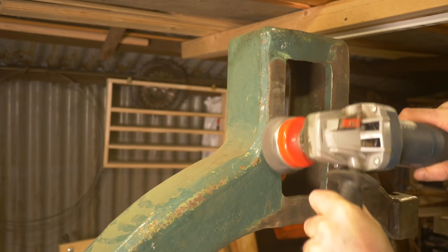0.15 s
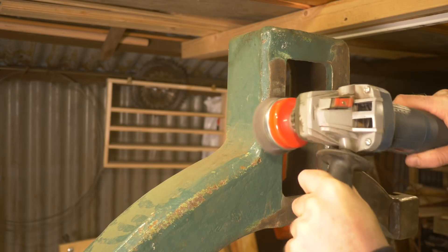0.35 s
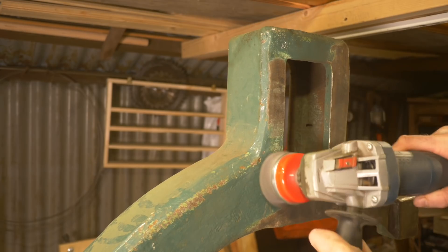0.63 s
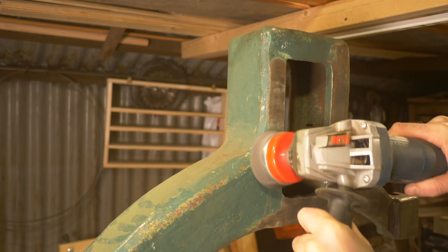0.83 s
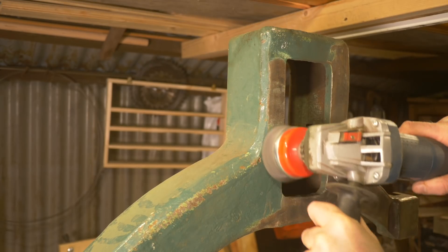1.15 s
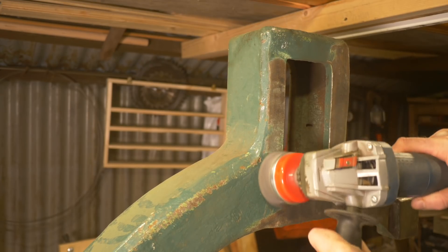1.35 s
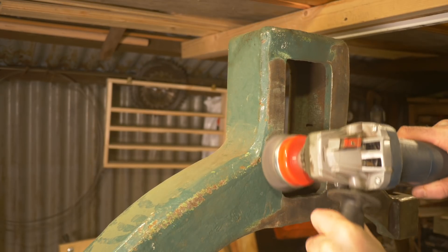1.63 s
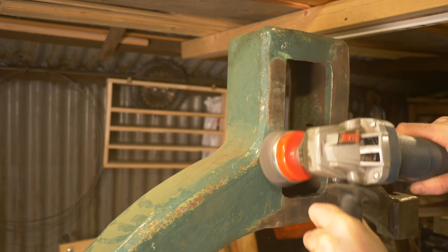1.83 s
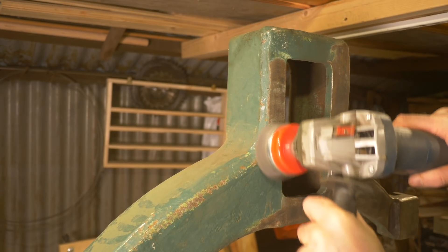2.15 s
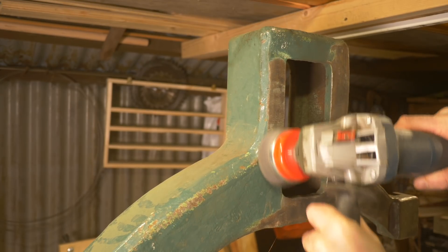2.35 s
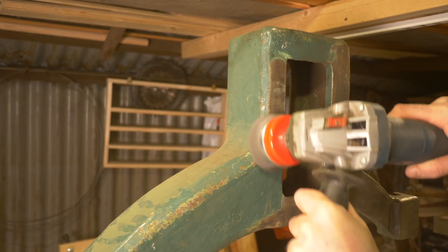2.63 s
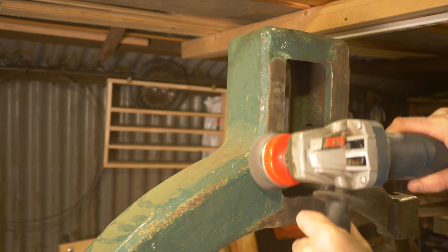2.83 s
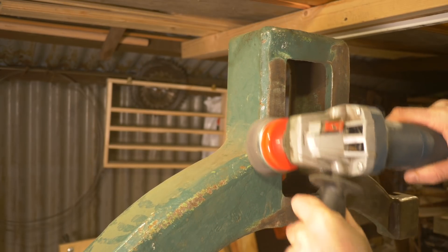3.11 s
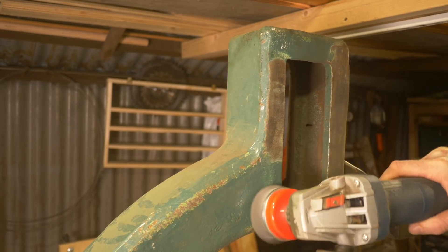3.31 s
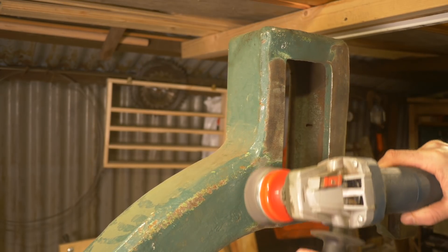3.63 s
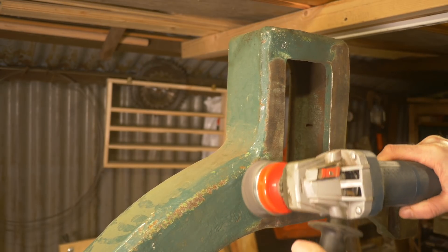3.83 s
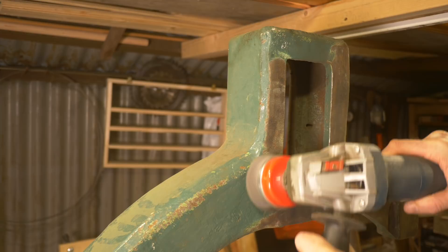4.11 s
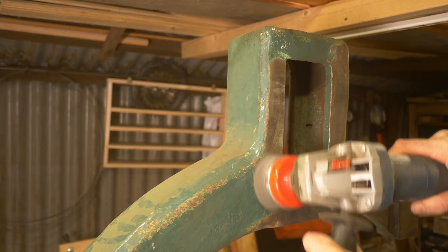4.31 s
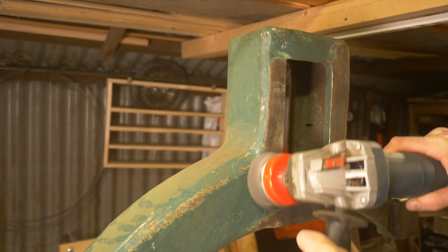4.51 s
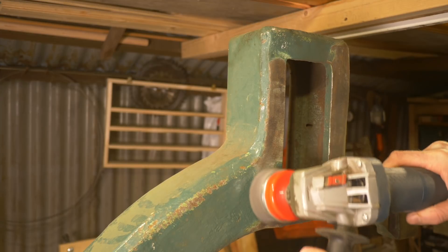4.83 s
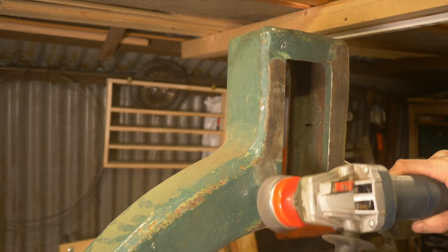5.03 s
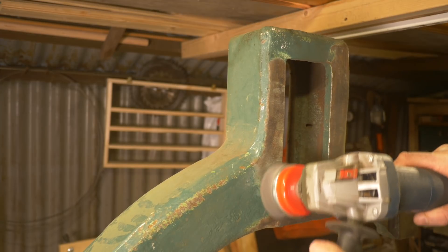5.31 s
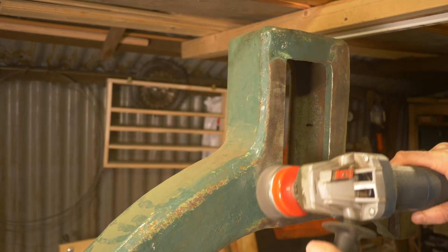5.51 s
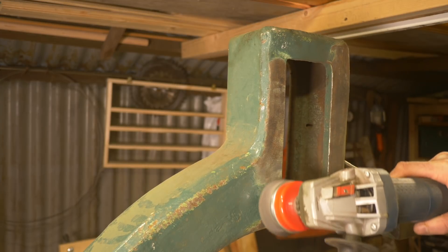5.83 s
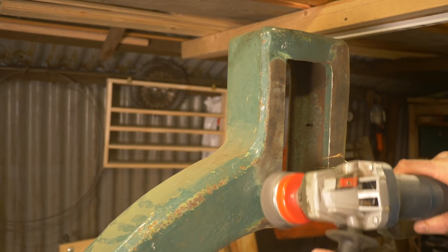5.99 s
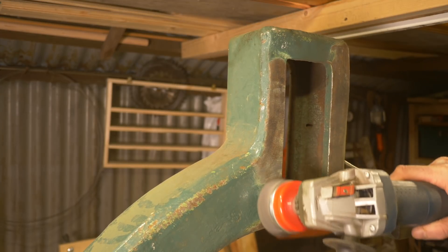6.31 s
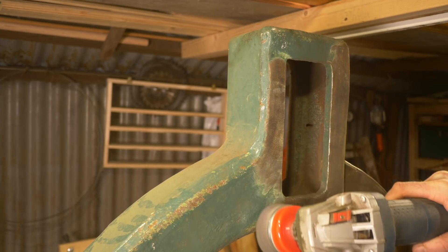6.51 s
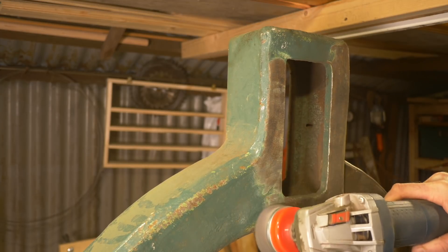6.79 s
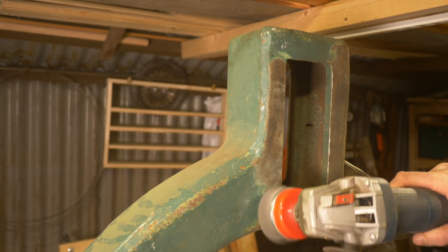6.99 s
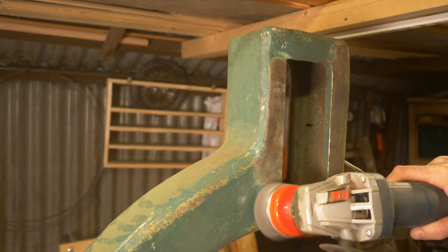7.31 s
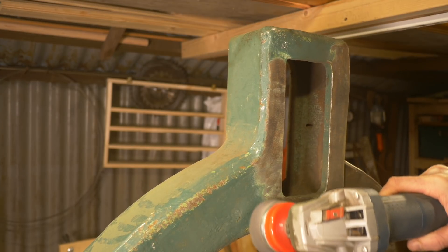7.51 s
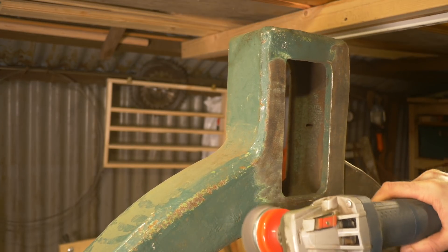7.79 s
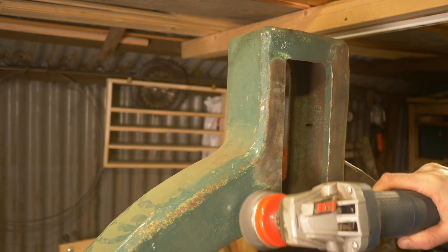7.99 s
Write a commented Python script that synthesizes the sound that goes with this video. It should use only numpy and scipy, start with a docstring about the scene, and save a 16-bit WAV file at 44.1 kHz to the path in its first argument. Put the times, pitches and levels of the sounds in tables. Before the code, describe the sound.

Close in a small workshop, an angle grinder's wire cup wheel scrubs a heavy metal frame without pause. It begins turned far down, then snaps to full level before one second. A dense, bright, rasping scrape dominates, with a very high thin motor whine that wavers and sags with each stroke. Brief low air buffets touch the microphone around three to four seconds. Short room reflections, centred sound.

```python
"""In a workshop, close by, an angle grinder with a wire cup wheel scours paint and rust off a cast metal frame.
Random strikes of wire tips, shaped by resonances, make the scrape, the ring of the cup and the rasp of the casting.
The motor's tones follow a speed that sags with each stroke, and they throb with the mains; filtered noise is its hiss.
Shaking makes the frame drone, mains hum lies below, and cooling air briefly brushes the microphone.
The sound starts turned down and jumps to full level."""
import sys
import numpy as np
from scipy import signal
from scipy.fft import rfft, irfft
from scipy.io import wavfile
from scipy.ndimage import uniform_filter1d

SR = 44100
rng = np.random.default_rng(int(sys.argv[2]) if len(sys.argv) > 2 else 0)


def put_to_file(sound):
    """Save the sound as 16-bit audio at rate SR, in the file named by the first command-line argument."""
    columns = np.atleast_2d(sound).T  # one column per channel
    safe = np.clip(columns, -1, 1)
    whole_steps = np.round(safe * 32767)
    wavfile.write(sys.argv[1], SR, whole_steps.astype(np.int16))


N = 359415
TIME = np.arange(N) / SR  # s
GEAR_RATIO = 3.9  # turns of the armature (the motor's rotor) for one turn of the spindle and wheel


def undb(db):
    """Turn decibels into a gain."""
    return 10 ** (np.asarray(db) / 20)


def unit(x):
    """Scale to an average (rms) level of 1."""
    return x / np.sqrt(np.mean(x ** 2))


def curves(table):
    """Turn the columns of a timed table into smooth controls, one value a sample."""
    times, *columns = np.transpose(table)
    return [uniform_filter1d(np.interp(TIME, times, column), size=1500, mode="nearest")
            for column in columns]


def walk(rate):
    """Wander at random: draw a level `rate` times a second, smooth twice, scale to rms 1."""
    hold = max(int(SR / rate), 1)
    steps = np.repeat(rng.standard_normal(N // hold + 1), hold)
    smooth = uniform_filter1d(uniform_filter1d(steps, hold), hold)
    return unit(smooth[:N])


def colour(x, points, modes=()):
    """Filter x by a broad response with resonances on top; rms 1."""
    f = np.maximum(np.arange(N // 2 + 1) * SR / N, 1)
    hz, db = np.transpose(points)
    broad = undb(np.interp(np.log(f), np.log(hz), db))
    ring = 1 + sum(undb(peak_db) / (1 + 1j * (f * f - f0 * f0) / (f * width))
                   for f0, width, peak_db in modes)
    return unit(irfft(rfft(x) * broad * ring, N))


def stiffened(x, points, rise):
    """Stiffer wires ring higher: blend toward a raised response as the share `rise` grows."""
    most = np.abs(rise).max() + 1e-9
    slack = colour(x, points)
    taut = colour(x, [(hz * (1 + most), db) for hz, db in points])
    return slack + rise / most * (taut - slack)


def wire_strikes(per_second, spread_db):
    """Wire tips flick the metal at random moments, with random force."""
    hit = rng.random(N) < per_second / SR
    force = rng.standard_normal(N) * undb(spread_db * rng.standard_normal(N))
    return unit(hit * force)


# how firmly the wheel meets the metal, before the layer trims and presses below:
# (time [s], casting rasp level [dB], cup ring level [dB], tip scrape level [dB], wire singing level [dB])
CONTACT = [(0.0, -43.5, -45, -46.2, -54), (0.4, -44, -44, -46, -56), (0.85, -44.5, -45, -47, -51),
           (1.15, -44.5, -44, -46.5, -53.5), (1.55, -44, -45, -46, -55), (2.2, -43.5, -44, -46, -52.5),
           (2.65, -44, -45.7, -46.5, -54), (3.0, -45, -46.1, -47, -53.5), (3.6, -45.5, -45, -46.5, -59),
           (4.4, -44.5, -45, -46.5, -55), (4.85, -44.5, -45, -45.5, -56), (5.35, -44.5, -45, -46, -59),
           (6.0, -44, -44.5, -45.5, -54), (6.5, -44, -44.5, -45.5, -54), (7.4, -44.5, -44.3, -45, -58),
           (7.85, -45, -45, -46, -51), (8.15, -44, -44.5, -45, -52)]
CUP_DB, FRAME_DB, TIPS_DB, HISS_DB = -1, -5.5, 0.18, -4.5  # trims; the hiss follows the tip scrape
CUP_PRESS_SHARE, TIP_PRESS_SHARE = 0.33, 0.57  # how much of each press reaches the cup and the tips


def scouring(spindle, ripple):
    """Wire strikes ring the cup, wires and casting; contact and presses set how loudly."""
    casting_db, ring_db, scrape_db, sing_db = curves(CONTACT)
    press_db = presses()
    bite = wheel_bite(spindle, ripple)
    rise = wire_bending()
    cup = cup_ring(bite, rise) * undb(ring_db + CUP_DB + CUP_PRESS_SHARE * press_db)
    tips = tip_scrape(bite, rise) * undb(scrape_db + TIPS_DB)
    sing = wire_singing(bite) * undb(sing_db)
    frame = casting_rasp(bite) * undb(casting_db + FRAME_DB + press_db)
    hiss = fan_and_dust(ripple) * undb(scrape_db + HISS_DB)
    bright = (tips + sing + hiss) * undb(TIP_PRESS_SHARE * press_db)
    return workshop(cup + bright, t60=0.18, wet_db=-13.5) + frame


# strokes on which the wheel digs in (+) or rides up (-): (time [s], change in casting rasp [dB])
PRESSES = [(.31, -1), (.61, 0), (.85, 0), (1.01, -1.8), (1.27, 0.5), (1.54, 1.5), (1.7, 0), (2.16, -2),
           (2.65, 2), (2.78, 1.5), (3.72, -1.5), (4.0, -1), (4.29, 1.5), (4.66, 0.5), (5.03, -.5),
           (5.43, -1.5), (5.58, 1), (5.85, 0), (6.02, 0.1), (6.15, -1.5), (6.39, 0.2), (6.53, -1),
           (6.78, 0), (6.94, 0.5), (7.07, -0.9), (7.2, 1), (7.65, 1.2), (7.77, -0.5)]
PRESS_WIDTH_S = 0.046


def presses():
    """Each press or lift swells the level up or down in a short, smooth bump."""
    return sum(db * np.exp(-((TIME - s) / PRESS_WIDTH_S) ** 2) for s, db in PRESSES)


def wheel_bite(spindle, ripple):
    """The uneven wheel bites harder once a turn, throbs with the mains and chatters in the hand."""
    steady_db = 0.08 * np.sin(spindle) + .08 * ripple
    chatter_db = 0.056 * walk(4.5) + 0.27 * walk(35) + 0.085 * walk(230)
    return undb(steady_db + chatter_db)


# bending of the wire bundles: (time [s], share by which the cup's ring rises [1 = whole pitch])
BENDING = [(0, .012), (.75, .01), (1.1, .003), (4.3, 0), (5.4, .012), (5.75, .035), (6.15, .04),
           (6.55, .018), (8.15, .01)]


def wire_bending():
    """Bending stiffens the wire bundles, most of all when pressed into the joint."""
    return curves(BENDING)[0]


# ring of the cup and its wire bundles: (frequency [Hz], relative level per Hz [dB])
CUP_COLOUR = [(1200, -42), (1900, -19.5), (2700, -12.5), (2950, -4.5), (3130, -1.5), (3280, 0.5),
              (3430, -1.2), (3650, -1.5), (4050, -9.5), (4700, -13), (6500, -51)]


def cup_ring(bite, rise):
    """Strikes ring the cup and its wire bundles, higher as the wires stiffen."""
    return stiffened(bite * wire_strikes(per_second=40000, spread_db=1.2), CUP_COLOUR, rise)


# scrape of the wire tips: (frequency [Hz], relative level per Hz [dB])
TIP_COLOUR = [(2500, -30), (3600, -7.5), (4150, -2), (4550, -2), (5000, 0.4), (5550, -1), (6000, -3),
              (6450, -7.5), (7200, -11), (8300, -19), (11000, -37)]
TIP_BEND_SHARE = .4  # the tips rise by this share of the cup's rise


def tip_scrape(bite, rise):
    """Strikes sound the short wire tips, which rise less in pitch than the cup."""
    strikes = bite * wire_strikes(per_second=30000, spread_db=1.5)
    return stiffened(strikes, TIP_COLOUR, TIP_BEND_SHARE * rise)


# singing of the wires: (frequency [Hz], relative level per Hz [dB])
SING_COLOUR = [(4900, -41), (5350, -5.5), (5620, -6), (5850, -5), (6200, -34)]


def wire_singing(bite):
    """The wires sing in a narrow band when they meet an edge."""
    return colour(bite * wire_strikes(per_second=12000, spread_db=-0.5), SING_COLOUR)


# broad response of the casting: (frequency [Hz], relative level per Hz [dB])
FRAME_COLOUR = [(30, -26), (75, -38), (130, -23), (190, -14.5), (260, -13.5), (350, -8.5), (480, -8.5),
                (630, -4), (780, -1.5), (950, 0.3), (1300, 3.5), (1550, 1.5), (1900, 6), (2300, 9),
                (2620, 7), (3000, 8), (5000, -35)]
# resonances (modes) of the casting, also used by frame_drone:
# (frequency [Hz], width [Hz], level against the broad response [dB])
FRAME_MODES = [(282, 12, -6), (301, 8, -9), (400, 10, -5), (439.5, 7, -5), (501, 12, -4), (544.5, 15, -4),
               (591, 6, -1), (645, 14, -5), (695, 10, -7), (854, 22, -10), (878, 10, -12), (945, 30, -10),
               (1135, 46, -4), (1424, 26, -8), (1717, 30, -7)]


def casting_rasp(bite):
    """Strikes shake the casting, which answers broadly and at its own resonances."""
    return colour(bite * wire_strikes(per_second=30000, spread_db=0.1), FRAME_COLOUR, FRAME_MODES)


# dry hiss of fan and flying dust: (frequency [Hz], relative level per Hz [dB])
HISS_COLOUR = [(3000, -30.5), (5500, -12.5), (7200, -1.5), (8500, -2.5), (9600, 0.5), (10200, -1),
               (10950, 0.5), (11650, -5), (12600, -1.5), (13300, -11), (14300, -24), (15300, -12.5)]


def fan_and_dust(ripple):
    """Turbulent air and dust make bright noise that flickers and throbs a little."""
    return colour(rng.standard_normal(N), HISS_COLOUR) * undb(.07 * ripple + 0.42 * walk(25))


def workshop(x, t60, wet_db):
    """Nearby walls and roof answer with a short dense tail that fades 60 dB in t60 seconds."""
    t = TIME[:SR // 2]
    tail = rng.standard_normal(len(t)) * undb(-60 * t / t60) * (t > .004)  # starts after 4 ms
    return x + undb(wet_db) * signal.fftconvolve(x, tail / np.linalg.norm(tail))[:N]


# loudness of the whine, before a fixed lift of 0.9 dB: (time [s], level [dB])
WHINE_LOUDNESS = [(0.0, -51), (.27, -47.5), (.53, -48), (.72, -44.5), (.95, -46), (1.1, -48.5), (1.38, -49),
                  (1.63, -45), (1.95, -48), (2.15, -45.5), (2.45, -46.5), (2.8, -43.5), (2.92, -47),
                  (3.12, -41.5), (3.39, -49.7), (3.6, -45), (3.77, -48.7), (3.92, -45), (4.07, -49),
                  (4.22, -44.5), (4.38, -46), (4.58, -45), (4.78, -48.5), (5.02, -45.5), (5.43, -50.3),
                  (5.62, -46.5), (6.2, -48.5), (7.42, -49), (7.57, -52), (7.68, -48.5), (8.15, -53)]
# motor tones, before waver and throb:
# (multiple of the armature speed [1], level [dB], mains throb depth [share of amplitude])
MOTOR_ORDERS = [(2, -84, .1), (6, -68, .15), (9, -74, 0.73), (10, -67.5, 1.5), (12, -72, .9),
                (16, -71, 1.3), (20, -76, .6)]
WHINE_ORDER = 23  # the whine's multiple of the armature speed
WHINE_THROB = .055  # share of amplitude, before the whine is scaled to its loudness


def motor(armature, ripple):
    """Tones locked to the armature; the current pulses twice a mains cycle and makes them throb."""
    # the whine flutters as the tool shakes against the work
    flutter = undb(0.85 * walk(25) + 0.85 * walk(160))
    whine_tone = np.sin(WHINE_ORDER * armature + .12 * walk(200))
    whine = unit(flutter * (1 + WHINE_THROB * ripple) * whine_tone)
    tones = sum(undb(db + 2.5 * walk(7)) * (1 + throb * ripple) * np.sin(round(order) * armature)
                for order, db, throb in MOTOR_ORDERS)
    return whine * undb(curves(WHINE_LOUDNESS)[0] + 0.9) + np.sqrt(2) * tones


# turning points of the motor speed, which sags with each stroke of the hand and recovers,
# before the tremble: (time [s], pitch of the whine [Hz])
SPEED = [(0.0, 13050), (.17, 13074), (.29, 12960), (.5, 13166), (.77, 12705), (.96, 12718), (1.05, 12665),
         (1.2, 12782), (1.39, 12650), (1.65, 12851), (1.81, 12765), (1.96, 12835), (2.06, 12786),
         (2.45, 13090), (2.56, 13058), (2.8, 13185), (2.95, 13167), (3.2, 13223), (3.48, 12960),
         (3.56, 12945), (3.84, 12483), (3.96, 12517), (4.1, 12355), (4.35, 12685), (4.47, 12572),
         (4.7, 12810), (4.86, 12580), (5.0, 12725), (5.17, 12595), (5.28, 12663), (5.47, 12506),
         (5.66, 12704), (5.87, 12560), (6.09, 12740), (6.26, 12628), (6.41, 12750), (6.56, 12630),
         (6.65, 12625), (6.79, 12528), (6.99, 12714), (7.08, 12670), (7.32, 12870), (7.52, 12760),
         (7.62, 12760), (7.8, 12585), (7.95, 12560), (8.15, 12420)]


def speed_of_strokes():
    """Turns of the armature per second: the rotor's inertia eases it between turning points."""
    times, whine_hz = np.transpose(SPEED)
    points = np.arange(len(times))
    stroke, part = np.divmod(np.interp(TIME, times, points), 1)
    eased = stroke + np.sin(np.pi * part / 2) ** 2
    return np.interp(eased, points, whine_hz) / WHINE_ORDER


# hum of the wheel at twice the spindle speed, before its waver: (time [s], level [dB])
WHEEL_HUM = [(0, -81), (.7, -80), (.9, -77.5), (1.3, -76.5), (1.5, -80), (2.1, -78), (2.45, -93),
             (3.25, -93), (3.55, -84), (3.85, -78.5), (4.45, -77), (5.0, -80.5), (6.8, -80.5), (7.3, -85.5),
             (7.8, -83), (8.05, -78)]
# shaft unbalance shaking the casting, before waver and the gain of the resonances:
# (multiple of the spindle speed [1], level high on the frame [dB], level at the joint [dB])
SHAKE_ORDERS = [(1, -85, -86), (3, -73.5, -75), (4, -69.5, -75), (5, -69, -74), (6, -65.5, -68),
                (8, -70, -70.5), (10, -66, -67)]
ROTOR_SHAKE_DB = -72.5  # unbalance of the armature, before waver and the gain of the resonances
HUM_WAVER_DB = 2  # the wheel's hum wavers as the wires catch and slip


def frame_drone(spindle, spindle_hz):
    """The oval wheel hums twice a turn; unbalance shakes the casting, louder near its resonances."""
    def resonance(hz):
        """Gain of the casting at the frequency the shaft happens to shake it."""
        return 0.07 + sum(undb(db) / (1 + (2 * (hz - f0) / width) ** 2) for f0, width, db in FRAME_MODES)

    joint = at_joint()
    hum = undb(curves(WHEEL_HUM)[0] + HUM_WAVER_DB * walk(18)) * np.sin(2 * spindle)
    wheel = 0
    for order, top_db, joint_db in SHAKE_ORDERS:
        order = round(order)
        level = undb(top_db + (joint_db - top_db) * joint + walk(5))
        wheel = wheel + level * resonance(order * spindle_hz) * np.sin(order * spindle)
    rotor_level = undb(ROTOR_SHAKE_DB + 1.9 * walk(7.9)) * resonance(GEAR_RATIO * spindle_hz)
    rotor = rotor_level * np.sin(GEAR_RATIO * spindle)
    return np.sqrt(2) * (hum + wheel + rotor)


def at_joint():
    """The tool works down to the stiff joint: 0 high on the frame, 1 at the joint."""
    reached_s, approach_s = 5.2, 0.36
    return .5 + .5 * np.tanh((TIME - reached_s) / approach_s)


# cooling air reaches the microphone whenever the vents point there: (start [s], end [s], level [dB])
GUSTS = [(2.95, 3.05, -69), (3.15, 3.28, -67), (3.46, 3.5, -64), (3.56, 3.72, -66.5), (3.81, 3.86, -62)]
GUST_ATTACK_DB_PER_S, GUST_RELEASE_DB_PER_S, STILL_AIR_DB = 220, 62, -102


def cooling_air():
    """Gusts buffet the microphone: deep noise that rises fast and dies away more slowly."""
    # (frequency [Hz], relative level per Hz [dB])
    buffet_colour = [(4, -4), (12, 14), (25, -5), (50, -11), (80, -32), (200, -75)]
    buffet = colour(rng.standard_normal(N), buffet_colour)
    gusts_db = []
    for start, end, db in GUSTS:
        before = GUST_ATTACK_DB_PER_S * (start - TIME)
        after = GUST_RELEASE_DB_PER_S * (TIME - end)
        gusts_db.append(db - np.maximum(0, np.maximum(before, after)))
    return buffet * (undb(np.max(gusts_db, axis=0)) + undb(STILL_AIR_DB))


# mains hum: (frequency [Hz], level [dB])
HUM = [(50, -92.5), (100, -97.5), (150, -100)]


def mains_hum():
    """Faint steady tones at the mains frequency and its multiples."""
    return sum(np.sqrt(2) * undb(db) * np.sin(2 * np.pi * hz * TIME) for hz, db in HUM)


RIPPLE_HZ = 100  # the current pulses twice a mains cycle
ROCKING_RAD = .011  # the pulsing torque rocks the armature
SPEED_TREMBLE = .0005  # share by which the speed trembles as the wires snag


def scene():
    """The motor speed drives both shafts; everything is heard from the middle."""
    ripple = np.sin(2 * np.pi * RIPPLE_HZ * TIME)
    armature_hz = speed_of_strokes() * (1 + SPEED_TREMBLE * walk(22))
    armature = 2 * np.pi * np.cumsum(armature_hz) / SR + ROCKING_RAD * ripple  # angle in radians
    spindle = armature / GEAR_RATIO
    sound = scouring(spindle, ripple) + motor(armature, ripple)
    sound = sound + frame_drone(spindle, armature_hz / GEAR_RATIO)
    sound = sound + cooling_air() + mains_hum()
    return np.array([sound, sound])


def record(dry):
    """The level starts turned down and jumps up at once; a steep filter cuts the top."""
    turned_down_db, jump_s, top_hz = -20.5, .7704, 15700
    gain = undb(turned_down_db * (TIME < jump_s))
    top_cut = signal.ellip(10, .1, 70, top_hz, fs=SR, output="sos")
    return signal.sosfilt(top_cut, dry * gain)


dry = scene()
out = record(dry)
put_to_file(out)
```